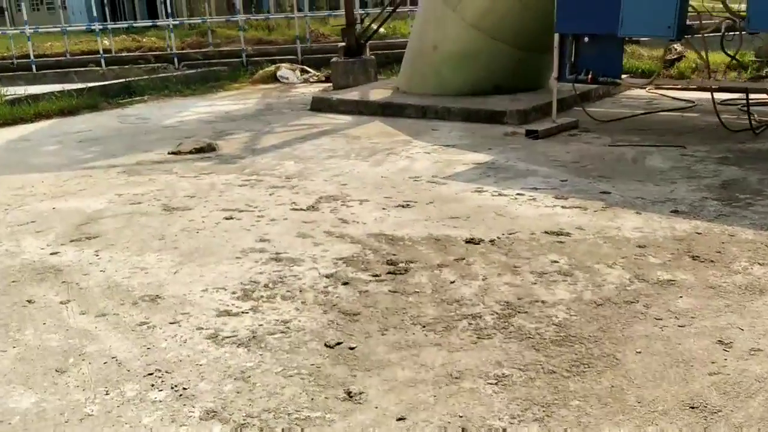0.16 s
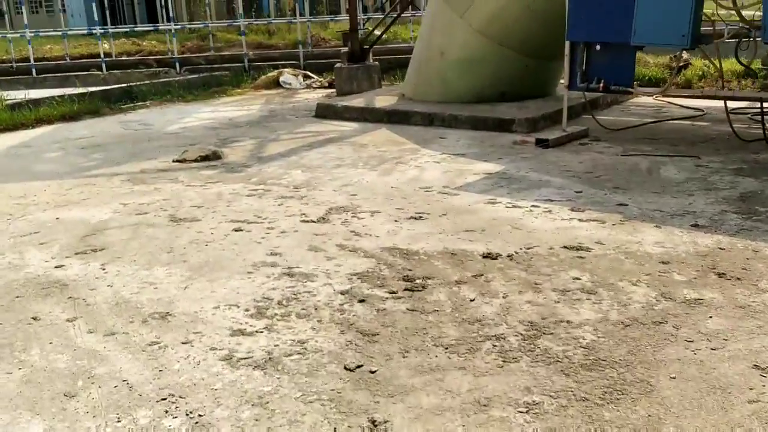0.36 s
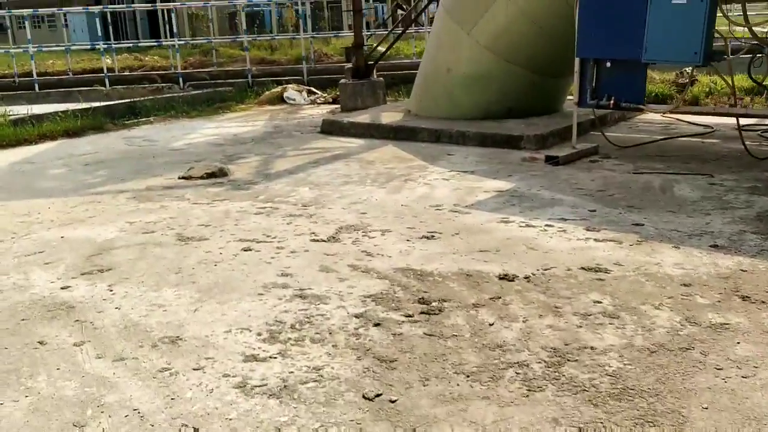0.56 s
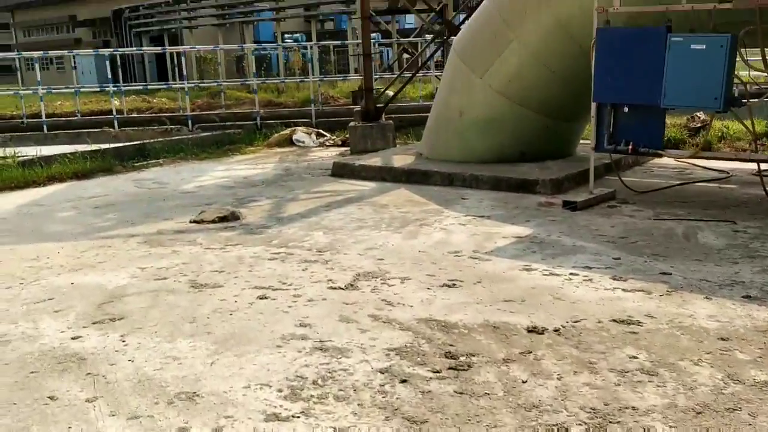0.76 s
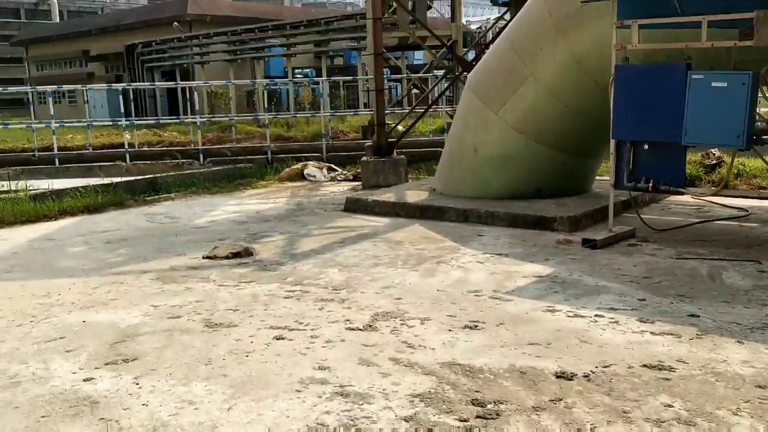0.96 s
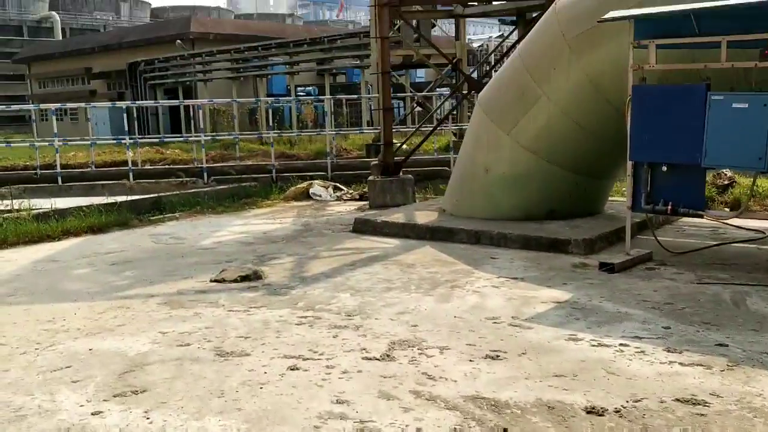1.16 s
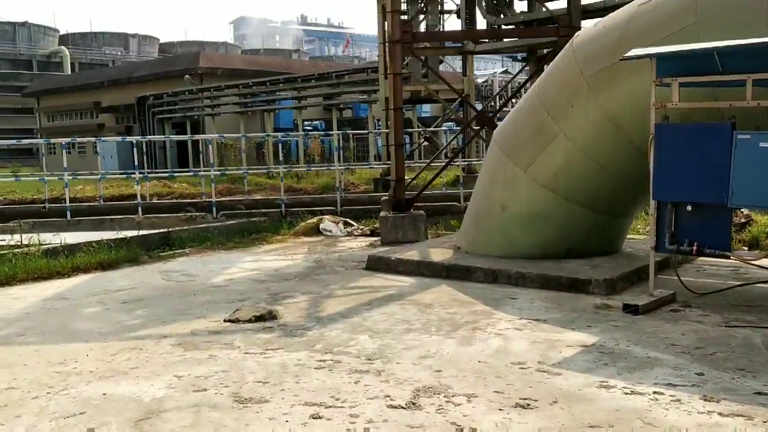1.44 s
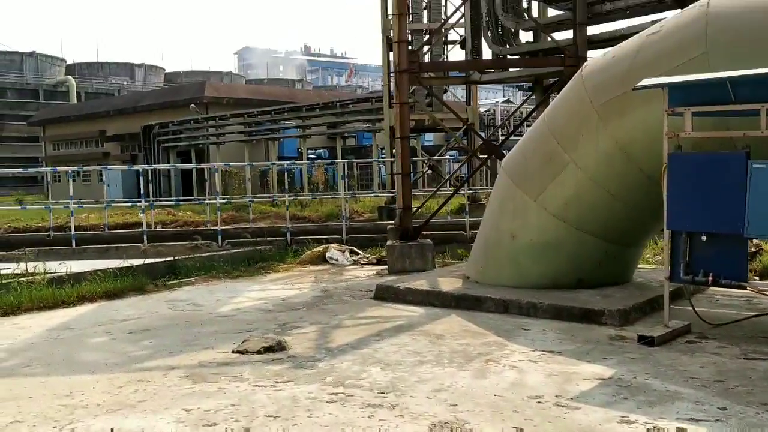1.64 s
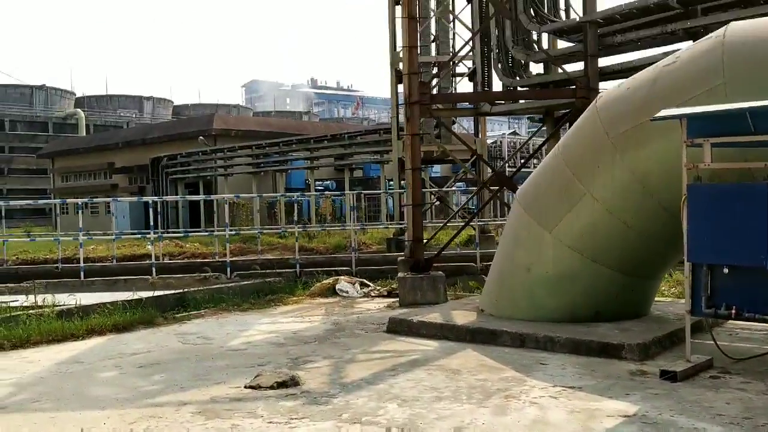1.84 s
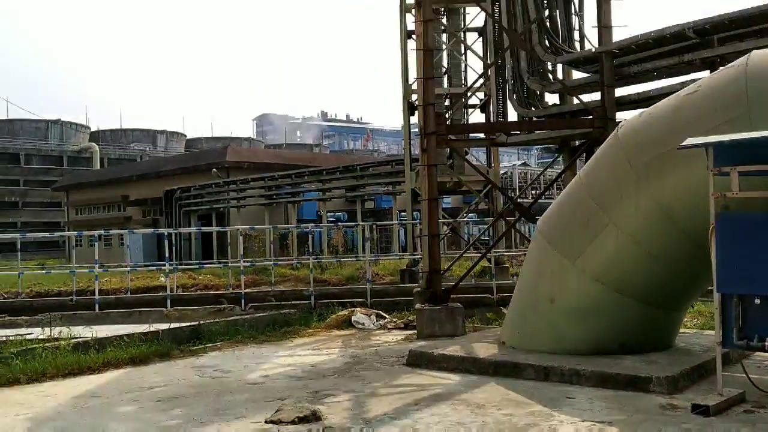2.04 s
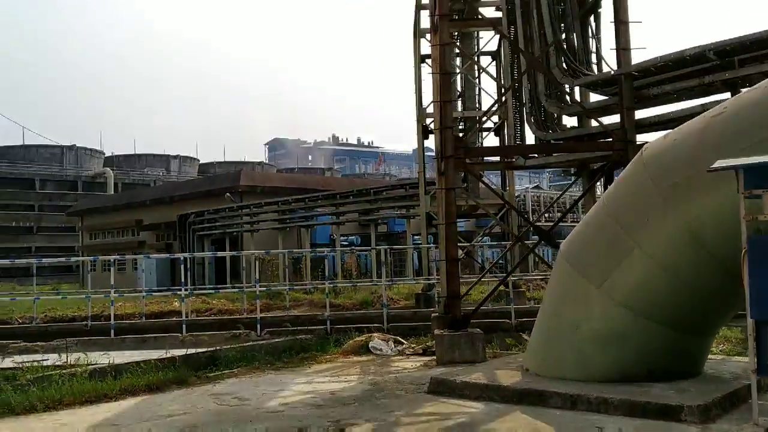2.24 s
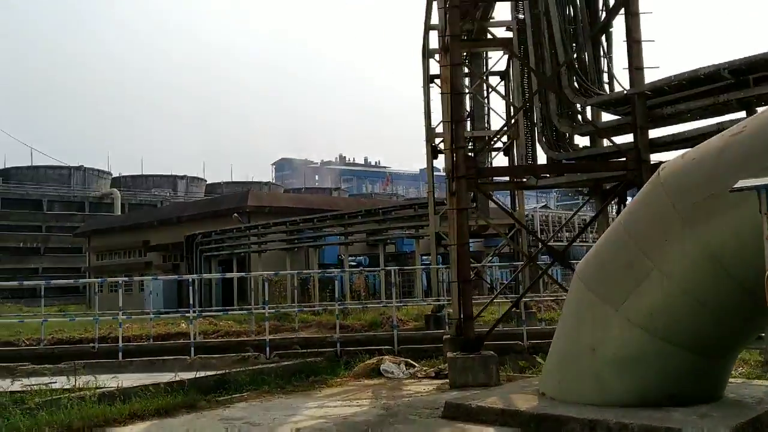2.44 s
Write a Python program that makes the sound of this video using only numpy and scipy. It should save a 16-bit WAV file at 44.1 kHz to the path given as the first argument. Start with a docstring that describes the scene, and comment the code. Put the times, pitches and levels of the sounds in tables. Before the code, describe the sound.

A steady, dense cooling-tower roar fills an open plant yard from 0 to 2.6 seconds. Far falling water gives a broad, level rush, partly from the right, above deep fan rumble and a slowly wavering low throb. A faint mid-pitched pump whine fades around 1.1-1.2 seconds; a weak duct hum drifts underneath. Handheld stereo sound, left side coloured, treble grainy and dull at the very top.

```python
"""Cooling tower fans rumble from all around an open plant yard: shaped noise and a wandering low throb.
Water falls through the towers as a far, dense roar of shaped noise, part of it straight from the right.
A pump whines as an unsteady sine and fades; a duct hums as narrow-band noise.
The left microphone port has a resonance, and the treble flickers."""
import sys
import numpy as np
from scipy import signal
from scipy.fft import rfft, irfft, next_fast_len
from scipy.io import wavfile
from scipy.ndimage import uniform_filter1d, map_coordinates

SR = 44100
rng = np.random.default_rng(int(sys.argv[2]) if len(sys.argv) > 2 else 0)


def attenuation_scalar(level_db):
    """Turn a level in dB into a linear amplitude multiplier (20 dB per decade)."""
    decades = np.asarray(level_db, float) / 20
    return 10 ** decades


def inscribe(sig):
    """Save sig as 16-bit PCM at rate SR to the path in sys.argv[1].

    A 1-D sig is mono; a 2-D sig holds one channel per row.
    Samples are clipped to [-1, 1] before scaling.
    """
    pcm = np.round(np.clip(np.atleast_2d(sig).T, -1, 1) * 32767)
    wavfile.write(sys.argv[1], SR, pcm.astype(np.int16))


N = 114219  # samples


def unit(x):
    """Normalization: scales a signal to rms 1 over all its channels."""
    return x / np.sqrt(np.mean(x ** 2) + 1e-20)


def along(points, hz):
    """Spectral interpolation: (Hz, value) points joined on a log frequency axis."""
    point_hz, value = np.transpose(points)
    return np.interp(np.log(hz + 1), np.log(point_hz + 1), value)


def curves(rows):
    """Envelopes: one value per sample for each column after the time in seconds."""
    seconds, *columns = np.transpose(rows)
    return [np.interp(np.arange(N) / SR, seconds, column) for column in columns]


def wobble(rate):
    """Slow random modulation: a smooth curve through random knots, rate of them a second."""
    knots = rng.standard_normal(int(N * rate / SR) + 4)
    return map_coordinates(knots, [np.arange(N) * rate / SR])


def filtered(x, response):
    """Linear filtering: the spectrum of x times a complex response of frequency."""
    size = next_fast_len(N + 8192)
    spectrum = rfft(x, size) * response(np.fft.rfftfreq(size, 1 / SR))
    return irfft(spectrum, size)[..., :N]


def noise(patchy_db, channels):
    """Random excitation: independent white noises sharing patches of random gain, patchy_db rms."""
    z = signal.stft(rng.standard_normal((channels, N)), nperseg=512)[2]
    field = rng.standard_normal(z.shape[1:])
    field = uniform_filter1d(uniform_filter1d(field, size=6, axis=0), size=12, axis=1)
    return signal.istft(z * attenuation_scalar(patchy_db * unit(field)), nperseg=512)[1][:, :N]


def around(gain, patchy_db):
    """Diffuse field: the mid/side balance sets the correlation of the two ports by frequency."""
    # Likeness of the two ports for sound from all around. Each row: frequency in Hz, correlation -1..1
    likeness = [(30, 1), (60, 0.77), (110, 1), (200, 0.75), (300, 0.64), (500, 0.28), (620, 0),
                (700, -0.45), (850, -0.25), (1050, -0.042), (1500, 0.029)]

    def mid_side_gain(hz):
        angle = np.arccos(np.clip(along(likeness, hz), -1, 1)) / 2
        return gain(hz) * [np.cos(angle), np.sin(angle)]

    mid, side = filtered(noise(patchy_db, channels=2), mid_side_gain)
    return np.array([mid + side, mid - side])


def duct_hum():
    """Resonance: the duct passes a narrow band of noise, heard as a hum of changing level."""
    # Loudness of the hum. Each row: time in seconds, level in dB
    hum_level = [(0, -57), (.35, -53), (.7, -57), (1.3, -54.5), (1.55, -54), (1.75, -53), (2.2, -59),
                 (2.5, -50), (2.59, -55)]
    center_hz, half_width_hz = 370.5, 25  # the amplitude halves at this distance from the center
    hum = unit(around(lambda hz: 1 / (1 + ((hz - center_hz) / half_width_hz) ** 2), patchy_db=3.5))
    return attenuation_scalar(curves(hum_level)[0]) * hum


def pump_whine():
    """Amplitude and phase modulation: a slightly unsteady sine that fades away."""
    # Loudness of the whine. Each row: time in seconds, level in dB
    whine_level = [(0, -49), (.48, -48.5), (.56, -51.5), (.85, -50.5), (1.08, -52), (1.2, -66), (2.59, -72)]
    pitch_hz, wander_rad, waver_db = 573.8, 0.3, 1.5
    phase = 2 * np.pi * pitch_hz * np.arange(N) / SR + wander_rad * wobble(15)
    tone = np.sqrt(2) * np.sin(phase)
    waver = waver_db * np.array([wobble(8.5), wobble(7.1)])  # each side on its own
    pan_db = np.array([[-0.8], [0.8]])  # left, right
    return attenuation_scalar(curves(whine_level)[0] + waver + pan_db) * tone


def falling_water():
    """Superposition: countless far drops blend to a roar; its direct part reaches the right port first."""
    # Loudness of the roar. Each row: time in seconds, level in dB
    water_level = [(0, -36), (.6, -36), (1.3, -35.5), (1.9, -36), (2.59, -35.5)]
    # Spectrum of falling water. Each row: frequency in Hz, relative density in dB per Hz
    roar = [(200, -7), (280, -6.5), (400, 0), (550, -2.5), (800, -2.5), (1300, -5), (2000, -3),
            (2550, -2.5), (2700, -4.5), (4000, -4.5), (5000, -6.5), (6200, -12), (7500, -18), (9200, -25),
            (11300, -22), (12100, -22.5), (12500, -27), (13070, -27), (13120, -70)]
    # Water heard straight from the right. Each row: frequency in Hz, share of the power 0..1
    direct_share = [(500, 0.006), (1000, 0.14), (2500, 0.3), (5000, 0.12), (12000, 0)]
    left_lag_s, left_turn_rad = 0.00088, 1.9

    def share(hz):
        return np.clip(along(direct_share, hz), 0, 1)

    def wide_gain(hz):
        return attenuation_scalar(along(roar, hz)) * np.sqrt(1 - share(hz))

    def direct_gain(hz):
        left = np.exp(1j * (left_turn_rad - 2 * np.pi * hz * left_lag_s))
        return attenuation_scalar(along(roar, hz)) * np.sqrt(share(hz)) * np.array([left, np.ones(len(hz))])

    wide = around(wide_gain, patchy_db=0.45)
    direct = filtered(noise(0.44, channels=1), direct_gain)
    level_db = curves(water_level)[0] + 0.061 * wobble(6.8)
    return attenuation_scalar(level_db) * unit(wide + direct)


def fan_throb():
    """Frequency modulation: a low sine of wandering pitch, its phase drifting apart at the two ports."""
    # Course of the throb. Each row: time in seconds, pitch in Hz before the wander, level in dB before the waver
    throb_course = [(0, 47.6, -44), (.3, 51.1, -41), (.63, 54.24, -39), (.8, 40.52, -42), (1.1, 41, -39),
                    (1.45, 41.65, -37.5), (1.65, 38.7, -41), (2.0, 37.5, -36), (2.25, 43.6, -39.5),
                    (2.59, 47.1, -36.5)]
    wander_rad, waver_db, side_rad = 1.1, 2.5, 0.75
    pitch_hz, level_db = curves(throb_course)
    phase = 2 * np.pi * np.cumsum(pitch_hz) / SR + wander_rad * wobble(9)
    apart = side_rad * wobble(6.14) * np.array([[0.5], [-0.5]])
    level_db = level_db + waver_db * (wobble(7.17) + wobble(18))
    return attenuation_scalar(level_db) * np.sqrt(2) * np.sin(phase + apart)


def fan_rumble():
    """Broadband radiation: the big slow fans give a steady deep rumble and a drone of changing level."""
    # Spectrum of the deep rumble. Each row: frequency in Hz, relative density in dB per Hz
    deep_spectrum = [(8, -24), (18, -19), (25, -8), (31, -1), (38, 0), (50, -5), (65, -10), (95, -30),
                     (150, -90)]
    # Spectrum of the drone. Each row: frequency in Hz, relative density in dB per Hz
    drone_spectrum = [(29, -31), (50, -7), (70, -5), (100, -6), (145, -11), (193, -11.5), (291, -21),
                      (330, -25.5), (430, -63), (730, -120)]
    # Loudness of the drone. Each row: time in seconds, level in dB
    drone_level = [(0, -36.5), (.3, -37.5), (.6, -37.5), (.9, -36), (1.1, -37.5), (1.3, -37.5), (1.55, -36),
                   (1.75, -38), (2.1, -37.5), (2.59, -35.5)]
    deep = unit(around(lambda hz: attenuation_scalar(along(deep_spectrum, hz)), patchy_db=-0.5))
    drone = unit(around(lambda hz: attenuation_scalar(along(drone_spectrum, hz)), patchy_db=0))
    return attenuation_scalar(-38.5) * deep + attenuation_scalar(curves(drone_level)[0]) * drone


def scene():
    """Superposition: the pressures of all sources add at the two ports."""
    return duct_hum() + pump_whine() + falling_water() + fan_throb() + fan_rumble()


def left_port(x):
    """Resonance: the left microphone port colours its channel; the right stays flat."""
    # Response of the left port. Each row: frequency in Hz, gain in dB
    port_gain = [(30, 0.2), (70, 1.6), (120, 0.8), (400, 1.05), (700, 1.5), (1050, 4), (1350, 10),
                 (1700, 9.5), (2100, 6.5), (2600, -2), (3100, -1), (3900, 1), (5200, -2), (6500, 1.5),
                 (9000, 0.9), (12500, -0.5)]
    return filtered(x, lambda hz: np.array([attenuation_scalar(along(port_gain, hz)), np.ones(len(hz))]))


def flicker(x):
    """Time-frequency modulation: thin, short streaks drop out of the treble, mid and side independently."""
    # Depth of the streaks. Each row: frequency in Hz, dB lost per unit of the field above the threshold,
    # before the bands are rebalanced
    streak_depth = [(1700, 0), (2200, 7), (2500, 8), (2620, 36), (3300, 32), (4000, 22), (6000, 22),
                    (8000, 20), (9300, 10), (11000, 12), (13000, 18)]
    threshold = 0.055  # lower = more streaks
    mid_side = np.array([x[0] + x[1], x[0] - x[1]]) / 2
    hz, _, z = signal.stft(mid_side, SR, nperseg=2048)
    field = rng.standard_normal(z.shape)
    field = uniform_filter1d(uniform_filter1d(field, size=4, axis=1), size=3, axis=2)
    excess = np.maximum(unit(field) - threshold, 0)
    gain = attenuation_scalar(-along(streak_depth, hz)[:, None] * excess)
    # rebalance: the mean power gain of neighbouring bands returns to about one
    band_power = uniform_filter1d(np.mean(gain ** 2, axis=(0, 2)), size=21)
    gain = gain / np.sqrt(band_power)[:, None]
    mid, side = signal.istft(z * gain, SR, nperseg=2048)[1][:, :N]
    return np.array([mid + side, mid - side])


def roll_off(x):
    """The treble ends steeply here."""
    return signal.sosfilt(signal.butter(12, 13200, fs=SR, output="sos"), x)


def record(dry):
    """Signal chain: the left port colours the sound, then the treble flickers."""
    ports = left_port(dry)
    finished = flicker(ports)
    return roll_off(finished)


dry = scene()
out = record(dry)
inscribe(out)
```